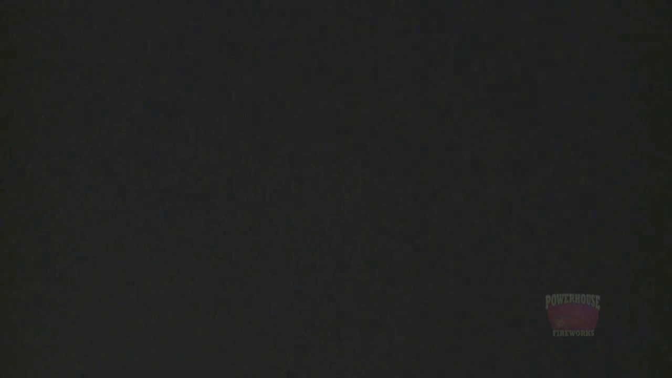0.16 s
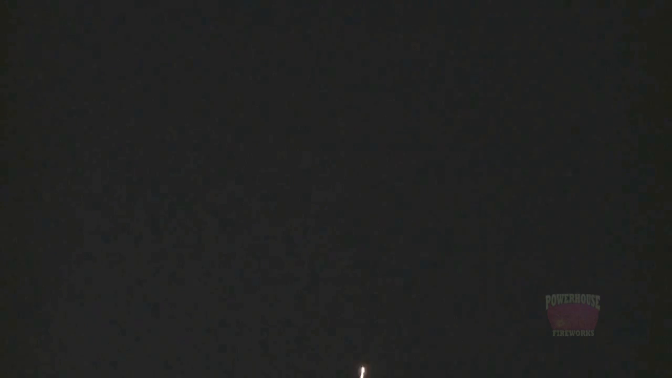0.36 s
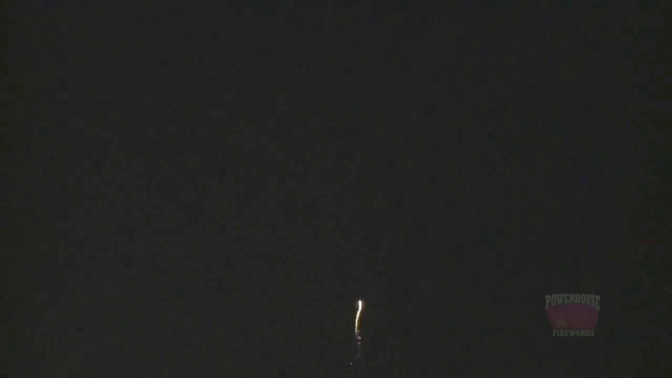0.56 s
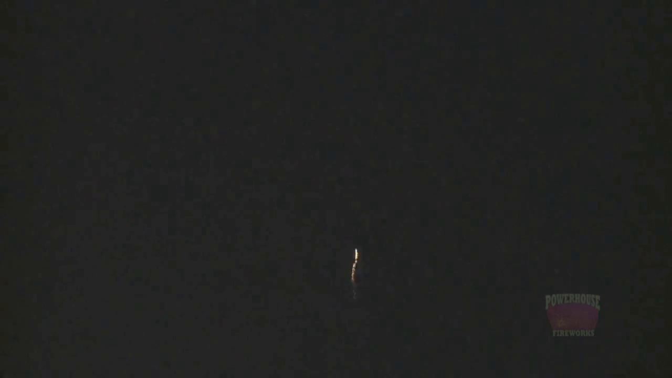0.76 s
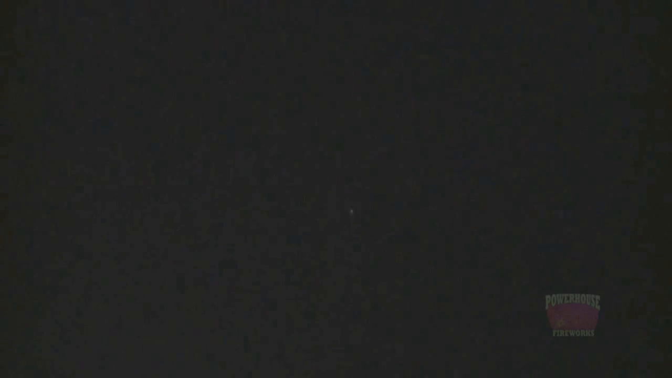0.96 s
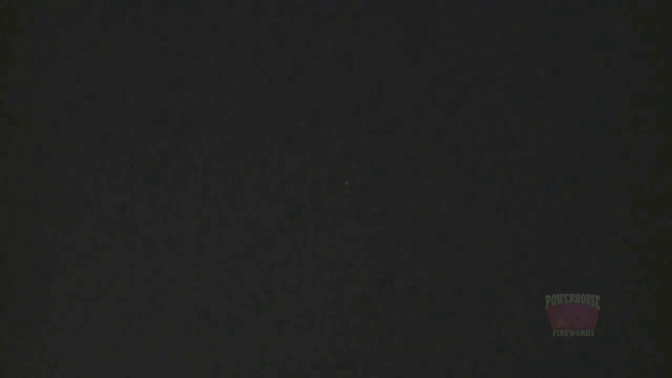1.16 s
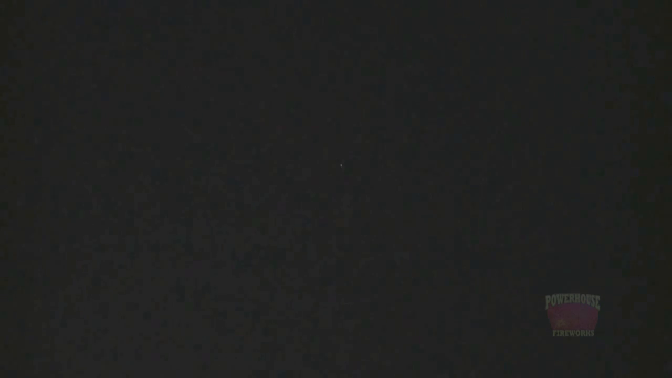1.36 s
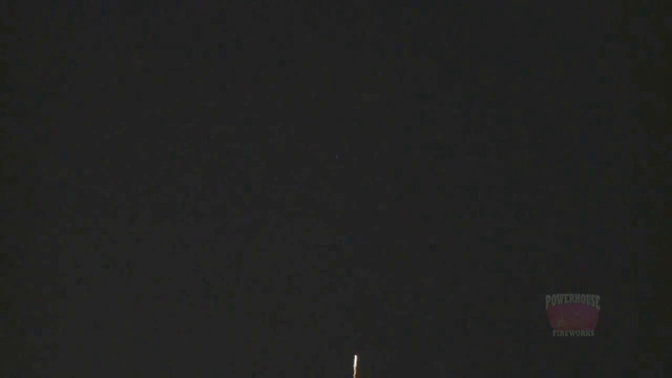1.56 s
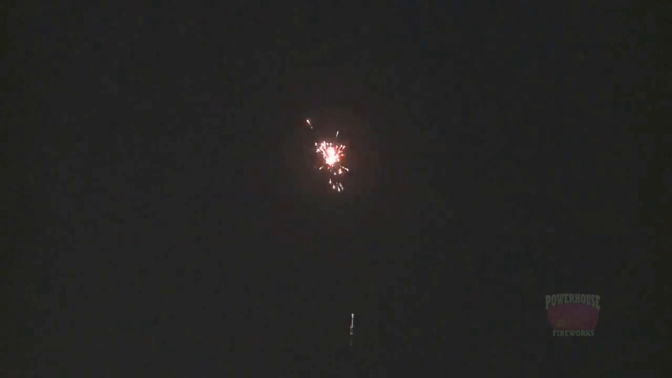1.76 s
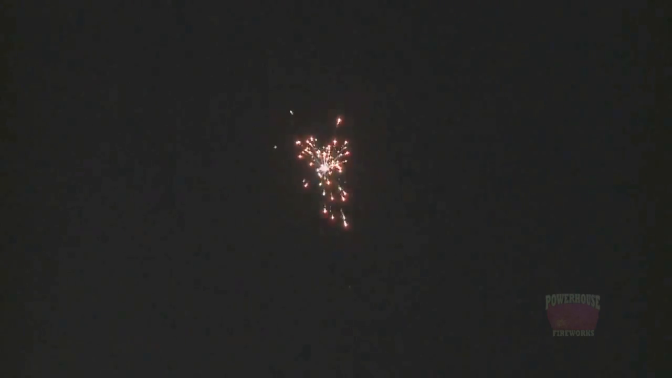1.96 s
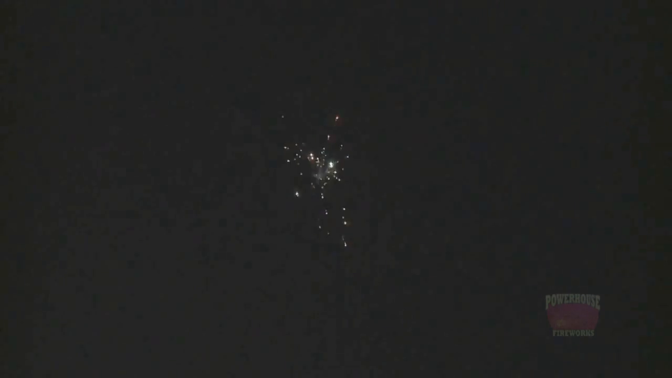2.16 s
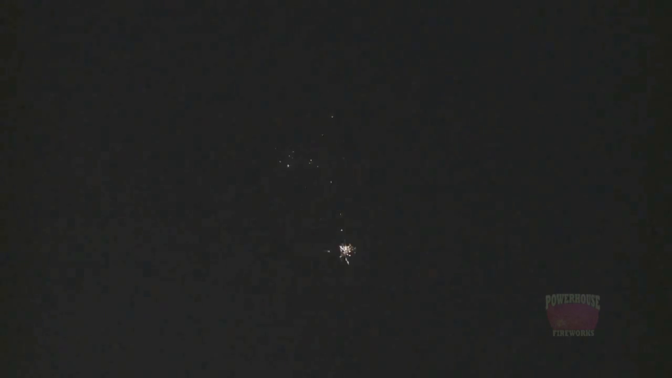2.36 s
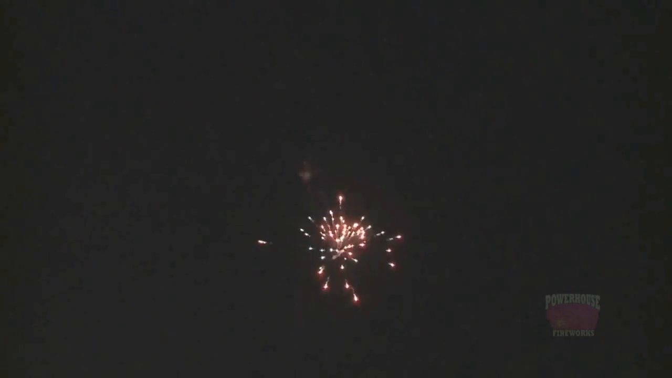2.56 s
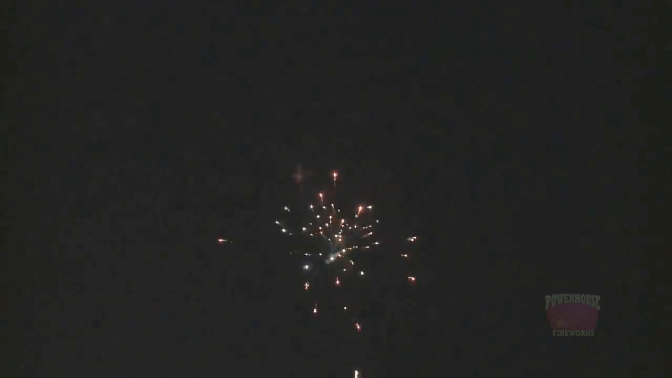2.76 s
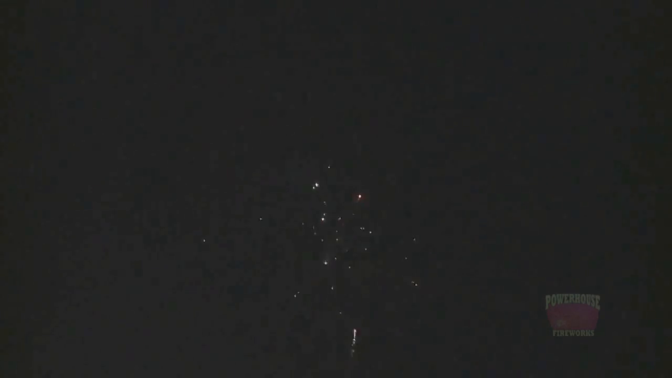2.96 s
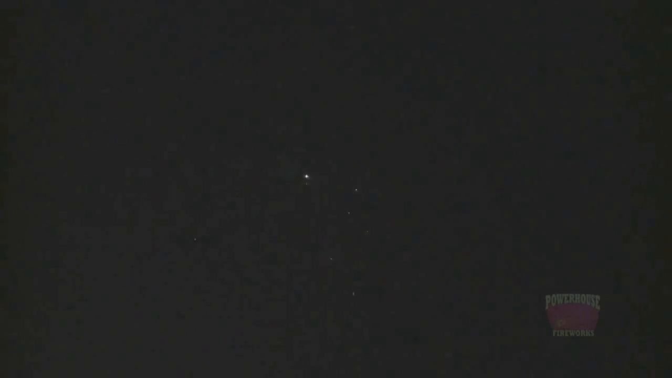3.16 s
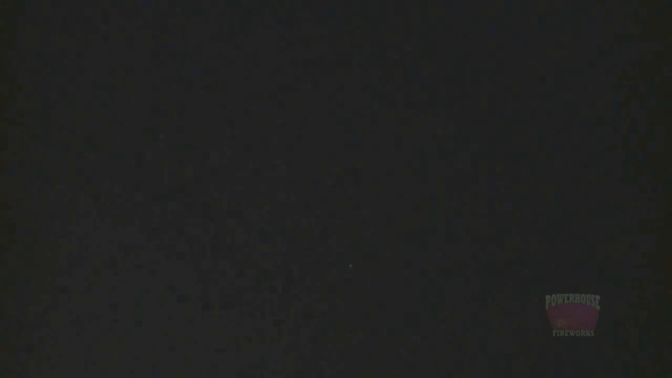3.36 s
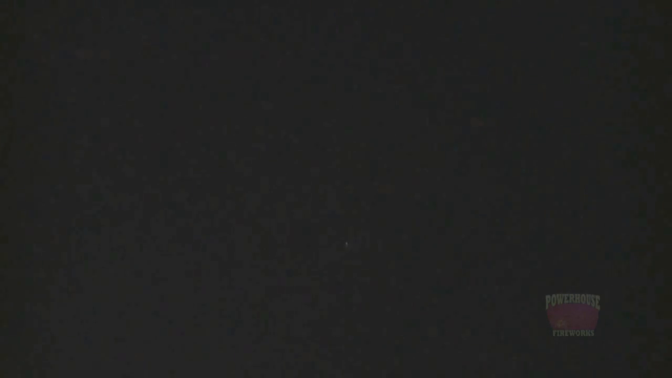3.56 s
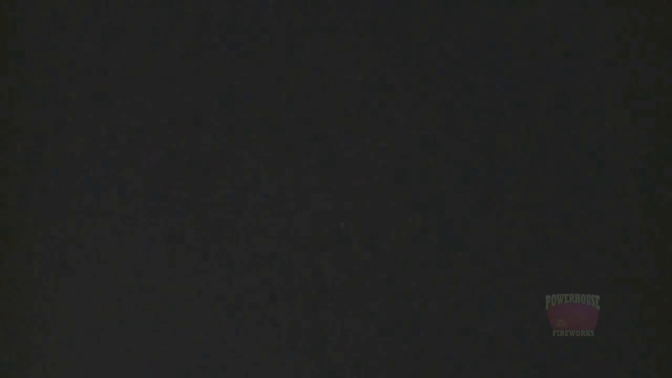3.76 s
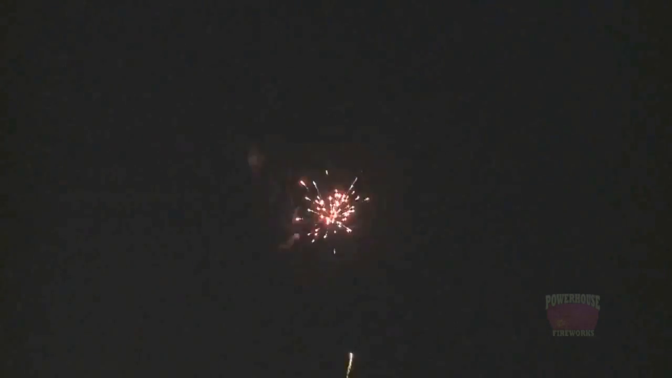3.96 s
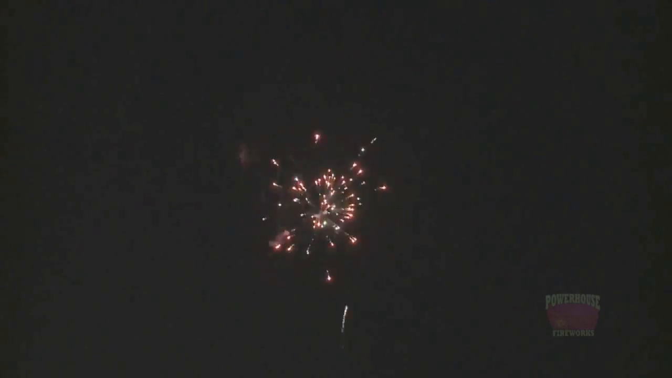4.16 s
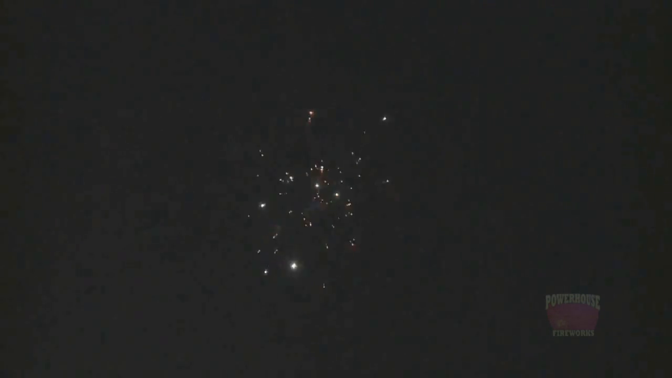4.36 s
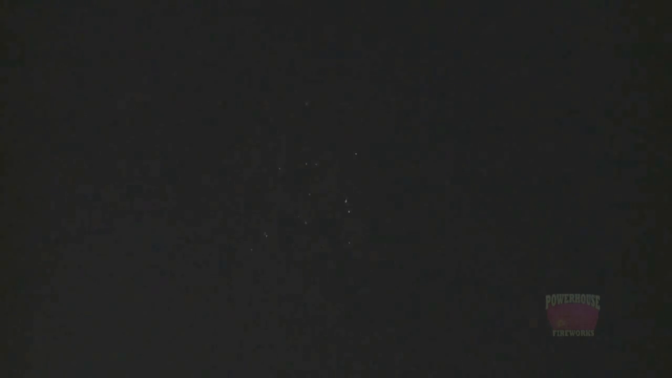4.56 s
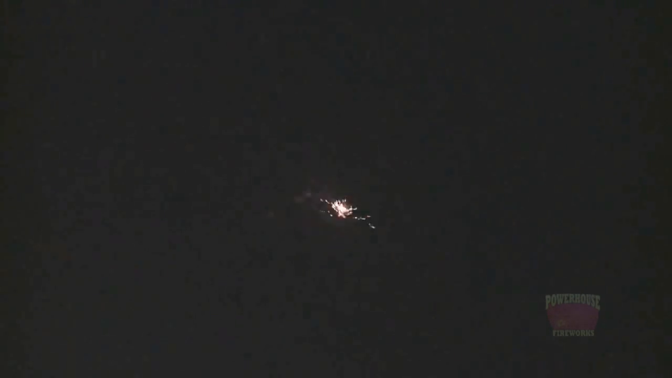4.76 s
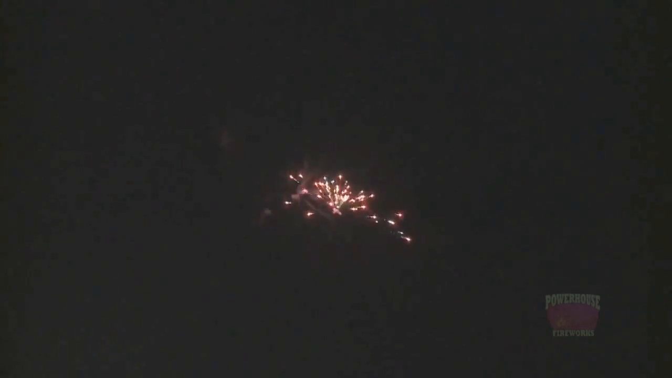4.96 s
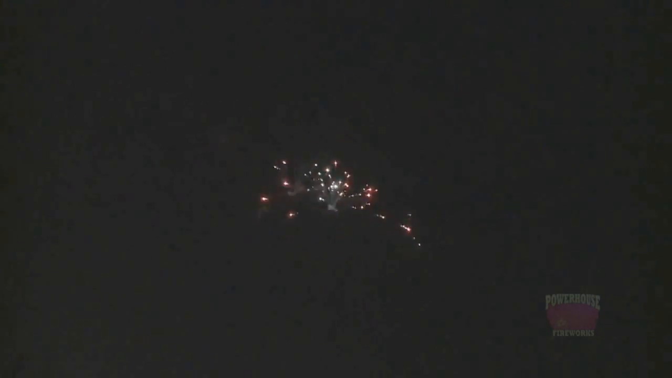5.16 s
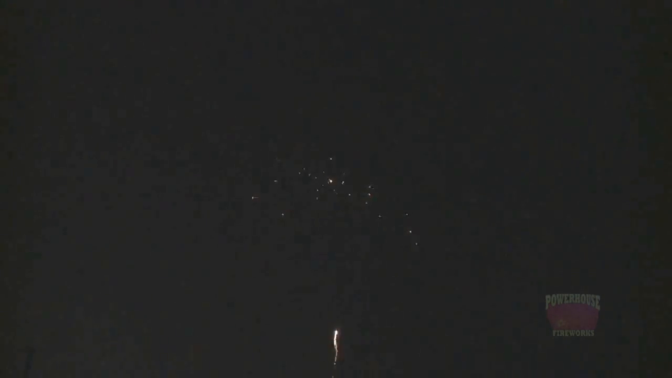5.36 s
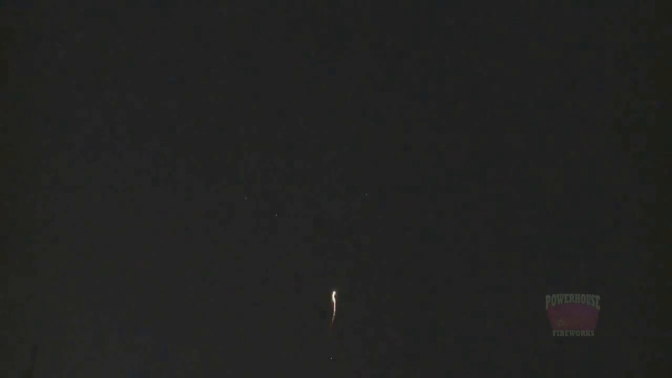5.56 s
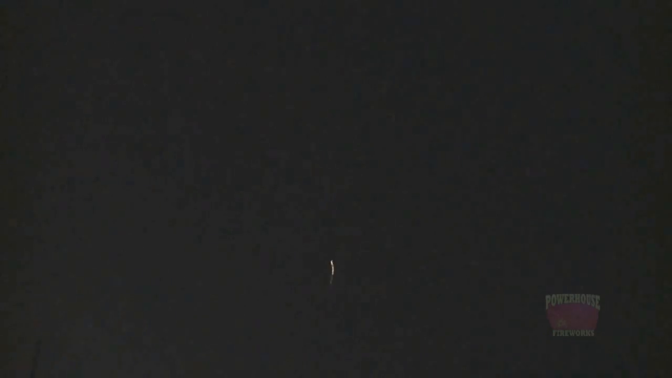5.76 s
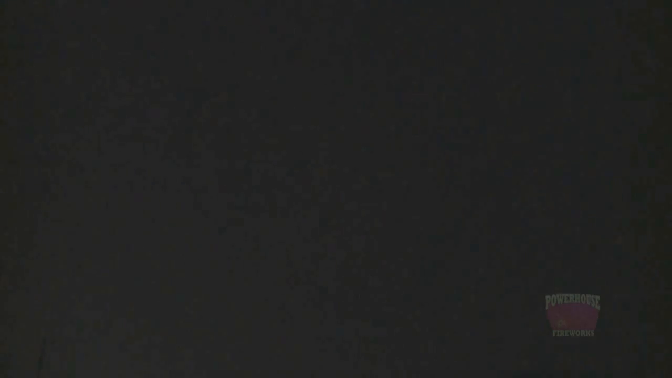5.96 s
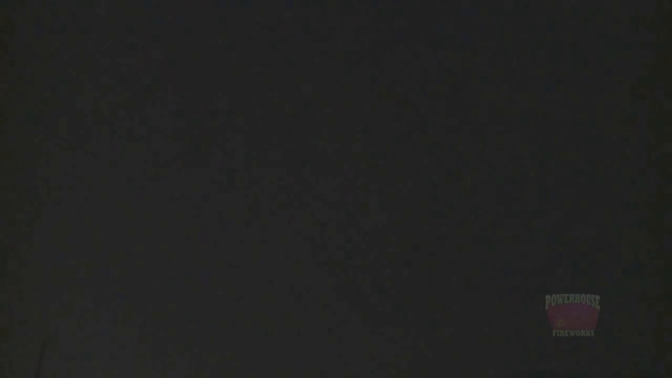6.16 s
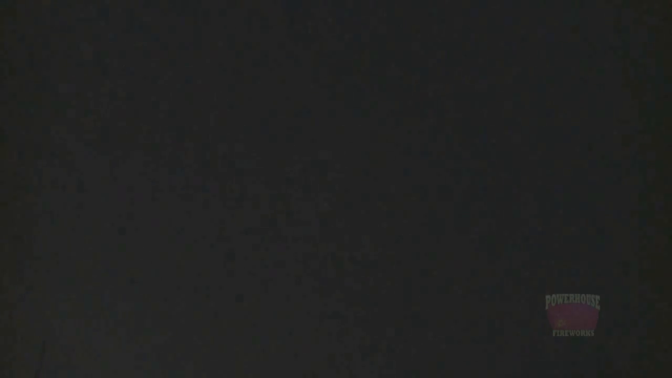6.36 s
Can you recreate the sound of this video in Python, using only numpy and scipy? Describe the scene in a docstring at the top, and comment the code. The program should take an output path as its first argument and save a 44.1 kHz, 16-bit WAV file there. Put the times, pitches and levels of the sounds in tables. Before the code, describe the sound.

The boom of a launch is already ringing at the start, then thumps and overhead cracks follow at uneven gaps. Walls and fences return quick slaps and brief rising tones; roofs patter back sharp echoes, and the neighbourhood rolls dully behind. Three small powder pops and a faint low engine hum hide in the night air. The close stereo microphone flattens the loudest blasts.

```python
"""A firework cake fires among houses at night: each lift charge thumps out of its cardboard tube, shells crack overhead.
Thumps are pulses with a ringing tube; cracks are brighter pulses. Walls, roofs, fences and trees answer both
with shaped noise, single echoes and short tones. Behind them lie three small pops, hissing night air and,
later on, the steady tone of a far engine. A small stereo microphone stands nearby and overloads on the peaks."""
import sys
import numpy as np
from scipy import signal
from scipy.fft import rfft, irfft
from scipy.io import wavfile

SR = 44100
rng = np.random.default_rng(int(sys.argv[2]) if len(sys.argv) > 2 else 0)


def int16_out(signal):
    """Quantize to a 16-bit WAV file."""
    q = np.round(np.clip(np.atleast_2d(signal).T, -1, 1) * 32767)
    wavfile.write(sys.argv[1], SR, q.astype(np.int16))


N = 286650  # samples in the scene
SIZE = 2 ** 17  # longest single sound, samples
T = np.arange(SIZE) / SR
HZ = np.maximum(np.fft.rfftfreq(SIZE, 1 / SR), 1)
# echo delays: a lift off the near wall and off the far house, a burst off the wall
WALL_S, HOUSE_S, OVERHEAD_ECHO_S = 0.0535, 0.4273, 0.066


def undb(db):
    """Decibels to gain."""
    return 10 ** (np.asarray(db) / 20)


def at(hz, points):
    """Read a table on a log-frequency axis."""
    table_hz, values = np.transpose(points)
    return np.interp(np.log(hz), np.log(np.maximum(table_hz, 1)), values)


def add(out, start_s, sound):
    """Mix a sound into out from start_s, cutting off whatever falls outside."""
    i = int(round(start_s * SR))
    first, last = max(i, 0), min(i + sound.shape[-1], out.shape[-1])
    if last > first:
        out[..., first:last] += sound[..., first - i:last - i]


def walk(rate_hz, size):
    """Random wander with a spread near 1: straight lines between rate_hz random points a second."""
    steps = np.arange(size) * rate_hz / SR
    return np.interp(steps, np.arange(SIZE // 32), rng.standard_normal(SIZE // 32))


def fade(t60, size=SIZE):
    """Exponential decay by 60 dB in t60 seconds."""
    return np.exp(-np.log(1000) * T[:size] / max(t60, 1e-3))


def strike(t60, rise_s, size):
    """Envelope that builds up and then dies away."""
    return fade(t60, size) * (1 - np.exp(-T[:size] / rise_s))


def pulse(points):
    """Causal (minimum-phase) pressure pulse with the given spectrum shape, peak 1."""
    cepstrum = irfft(np.log(undb(at(HZ, points))))
    # fold the second half onto the first, so that nothing sounds before the front
    cepstrum[1:SIZE // 2] *= 2
    cepstrum[SIZE // 2:] = 0
    x = irfft(np.exp(rfft(cepstrum)))[:SIZE // 8]
    return x / np.abs(x).max()


# width of diffuse sound at the two microphone ports: (frequency [Hz], side minus mid [dB])
PORT_WIDTH = [(60, -32), (150, -27.5), (360, -18), (870, -14.5), (1350, -8), (2100, -7.5), (3200, 3.5),
              (5000, 7), (8000, -29.5)]


def diffuse(points, size, tilt_db=0, grain_db=0, pivot_hz=600):
    """Dense arrivals from all sides, rms 1; grain_db spreads their sizes, and the ports agree in the bass."""
    hz = np.maximum(np.fft.rfftfreq(size, 1 / SR), 1)
    sizes = undb(grain_db * np.minimum(rng.standard_normal(size), np.pi))
    mid, side = rfft(sizes * rng.standard_normal((2, size)))
    width = undb(at(hz, PORT_WIDTH))
    tilt = tilt_db * np.log2(hz / pivot_hz)
    gain = undb(at(hz, points) + tilt) / np.hypot(1, width)
    x = irfft(gain * np.array([mid + width * side, mid - width * side]), size)
    return x / x.std()


# distant engine
ENGINE_START_S, ENGINE_SWELL_S, ENGINE_REV_S = 4.0, 0.095, 0.192  # start and two time constants
ENGINE_LOW_HZ, ENGINE_CRUISE_HZ = 87.8, 97.7  # firing rate at the start and once steady
ENGINE_DB, ENGINE_FADE_DB_PER_S = -38.5, 6


def engine(waver_db=1.5):
    """A far engine, one tone at its firing rate: it revs up, holds its speed and fades as it drives off."""
    t = np.maximum(np.arange(N) / SR - ENGINE_START_S, 0)
    hz = ENGINE_CRUISE_HZ + (ENGINE_LOW_HZ - ENGINE_CRUISE_HZ) * np.exp(-t / ENGINE_REV_S)
    level_db = ENGINE_DB - ENGINE_FADE_DB_PER_S * t + waver_db * walk(12, N)
    gain = (1 - np.exp(-t / ENGINE_SWELL_S)) * undb(level_db)
    return np.sqrt(2) * gain * np.sin(2 * np.pi * np.cumsum(hz) / SR)


# night air, spectrum shape: (frequency [Hz], relative level [dB])
NIGHT_AIR = [(25, -8), (60, -1.5), (150, 2), (500, 0), (1100, 7), (2600, -8.5), (4200, -24), (7000, -35.5),
             (10700, -30.5), (11400, -74)]


def background():
    """Night air as gently wavering noise with a faint hiss, and an engine droning far off."""
    air_gain = undb(-36 + 1.4 * walk(5.6, N))
    return engine() + air_gain * diffuse(NIGHT_AIR, N)


# dull sound of the far neighbourhood, spectrum shape: (frequency [Hz], relative level [dB])
FAR_ROLL = [(40, -44), (150, -10), (400, 3), (950, 4.5), (1400, 0), (2000, -11.5), (2700, -11),
            (4000, -27.5), (8000, -60)]


def roll(shots, level_db, t60, rise_s):
    """The far neighbourhood answers every shot with a long, dull, uneven roll; the powers add up."""
    power = np.zeros(N)
    for shot_s, _, tail_db, _ in shots:
        envelope = undb(level_db + tail_db) * strike(t60, rise_s, SIZE)
        add(power, shot_s, envelope ** 2)
    lumps = undb(1.8 * walk(25, N))
    return np.sqrt(power) * diffuse(FAR_ROLL, N, grain_db=5.5) * lumps


# snap of burning powder, spectrum shape: (frequency [Hz], relative level [dB])
POP_SNAP = [(300, -36), (1500, 5), (2500, 6), (4000, 0.5), (7000, -20), (10600, -12), (11500, -48)]
# small pops of burning powder: (time [s], snap level [dB], snap t60 [s], scattered sound level [dB])
POWDER_POPS = [(0.8673, -25, 0.042, -57), (5.341, -36, .06, -49), (5.606, -32, 0.17, -23.5)]


def pops():
    """Small noisy snaps of burning powder, each with a soft wash of echoes."""
    out, size = np.zeros((2, N)), SIZE // 4
    for pop_s, snap_db, t60, tail_db in POWDER_POPS:
        snap = diffuse(POP_SNAP, size) * strike(t60, 0.00044, size)
        add(out, pop_s, undb(snap_db) * snap)
        wash = diffuse(FAR_ROLL, size, tilt_db=2.5) * strike(0.7, 0.008, size)
        add(out, pop_s + 0.00201, undb(tail_db) * wash)
    return out


def scatter(points, t60s, tilt_db, grain_db, patchy_db, lumpy_db, rise_s):
    """Countless small echoes from nearby: they build up, come in clumps and die at a rate set by pitch."""
    size = SIZE // 2
    spectrum, hz = rfft(diffuse(points, size, tilt_db, grain_db)), HZ[::2]
    centres = [f for f, _ in t60s]
    out = 0
    # overlapping bands whose shares add up to one
    for share, (_, t60) in zip(np.eye(len(t60s)), t60s):
        band = irfft(spectrum * at(hz, np.c_[centres, share]))
        # each group of reflectors favours its own band
        out = out + band * strike(t60, rise_s, size) * undb(lumpy_db * walk(37.3, size))
    return out * undb(patchy_db * walk(159.1, size))


# crack of a shell, spectrum shape: (frequency [Hz], relative level [dB])
SHELL_CRACK = [(30, -27), (150, -7), (400, -0.5), (900, 8), (1500, 2.5), (2000, -3.5), (2600, -2.5),
               (3600, -4), (6000, -26.5), (10600, -34), (11600, -62)]


def slaps(table, tilt_db, patchy_db, air_db=6):
    """Crackly showers off rough reflectors; air dulls them by air_db per octave for each second of travel."""
    out, size = np.zeros((2, SIZE)), SIZE // 8
    for delay, db, t60 in table:
        shower = diffuse(SHELL_CRACK, size, tilt_db - air_db * delay) * undb(patchy_db * walk(348, size))
        add(out, delay, undb(db) * shower * strike(t60, 0.0013, size))
    return out


# boom of a lift in the gardens, spectrum shape: (frequency [Hz], relative level [dB])
GARDEN_BOOM = [(30, -28.5), (130, -15), (190, -9), (238, -2), (295, -4.5), (440, -0.5), (650, -2),
               (1000, -10), (1900, -19.5), (2500, -16.5), (3900, -31.5), (10400, -59.5), (11600, -69)]
# how fast that boom dies: (frequency [Hz], t60 [s])
GARDEN_T60 = [(60, 0.93), (250, 1.54), (500, 1.4), (1200, 0.82), (2500, 1.146), (5000, 0.75), (10000, 0.56)]


def lift_tail(tilt_db):
    """The boom of a lift scattered among the gardens at ground level."""
    return scatter(GARDEN_BOOM, GARDEN_T60, tilt_db, grain_db=4, patchy_db=1.9, lumpy_db=1.0, rise_s=0.016)


def knock(hz, width_s, front_db, lead_s):
    """A blast rounded by a long path: a cycle and a half centred on lead_s, with a trace of the sharp front."""
    t = T[:SIZE // 64] - lead_s
    body = -np.sin(2 * np.pi * hz * t) * np.exp(-(t / width_s) ** 2)
    front = diffuse(SHELL_CRACK, len(t)) * np.exp(-(2 * t / width_s) ** 2)
    return body + undb(front_db) * front


# far house: level of the first return [dB], loss on each further round trip [dB]
HOUSE_DB, HOUSE_LOSS_DB = 4, 18.5


def far_house(shot_s, count=2):
    """Dull knocks back from a far house, weaker on every round trip, each doubled by the near wall."""
    out, size = np.zeros((2, N)), SIZE // 8
    lead_s = 0.006
    for trip in range(count):
        db = HOUSE_DB - trip * HOUSE_LOSS_DB
        for wall_s in (0, WALL_S):
            arrival = shot_s + (trip + 1) * HOUSE_S + wall_s
            dull_knock = knock(hz=510, width_s=0.0012, front_db=-20, lead_s=lead_s)
            add(out, arrival - lead_s, undb(db) * dull_knock)
            wash = diffuse(GARDEN_BOOM, size) * strike(0.22, 0.0016, size)
            add(out, arrival, undb(db - 22.5) * wash)
    return out


# rising echoes of each lift, as from rows of fence boards:
# (delay [s], starting pitch [Hz], rise [Hz/s], fundamental [dB], octave [dB], t60 [s])
FENCE_ROWS = [(.05, 199.8, 1546, -17, 1.5, 0.18), (.205, 249.6, 660, -15.5, -21, 0.39)]


def fences(patchy_db=4.5):
    """Evenly spaced boards return a thump one after another, as a short rising tone."""
    out, size = np.zeros(SIZE // 4), SIZE // 16
    for delay, hz, rise, low_db, octave_db, t60 in FENCE_ROWS:
        phase = 2 * np.pi * np.cumsum(hz + rise * T[:size]) / SR
        tone = undb(low_db) * np.sin(phase) + undb(octave_db) * np.sin(2 * phase)
        patches = undb(patchy_db * walk(90, size))
        soft_end = np.minimum(np.linspace(10, 0, size), 1)
        add(out, delay, tone * strike(t60, 0.006, size) * patches * soft_end)
    return out


# separate roofs: time span [s], level [dB] before the fall with delay, fall [dB/s], spread either way [dB]
ROOF_SPAN_S, ROOF_DB, ROOF_FALL_DB_PER_S, ROOF_SPREAD_DB = 0.42, -1, 54, 2.5
# colour of one roof echo, spectrum shape: (frequency [Hz], relative level [dB])
ROOF_COLOUR = [(100, -37), (500, -7), (1100, 4), (2600, 3), (4200, -16), (6500, -26.5), (10500, -39),
               (11600, -64)]


def roofs(lag_s=0.00016, count=44):
    """Separate sharp echoes from all around: ever sparser and weaker, each reaching one port first."""
    out, crack = np.zeros((2, SIZE // 2)), pulse(ROOF_COLOUR)
    for place, side, roof_size in rng.uniform(-1, 1, (count, 3)):
        delay = OVERHEAD_ECHO_S + ROOF_SPAN_S * place ** 2
        echo_db = ROOF_DB - ROOF_FALL_DB_PER_S * delay + ROOF_SPREAD_DB * roof_size
        echo = undb(echo_db) * crack
        add(out[0], delay + lag_s * side, echo)
        add(out[1], delay - lag_s * side, echo)
    return out


# late ringing echo of a burst: centre of the first ring, half length of a ring, pitch, rise per repeat
RINGING_S, RINGING_WIDTH_S, RINGING_HZ, RINGING_STEP_HZ = 0.595, 0.023, 850, 8.4


def ringing(third_db=-1, count=3):
    """A late echo that rings roughly on one note and its third harmonic, and flutters off the near wall."""
    out, size = np.zeros((2, SIZE // 2)), SIZE // 2
    waver_hz, rough_db = 34, 4
    for k in range(count):
        swell = np.exp(-((T[:size] - RINGING_S - k * WALL_S) / RINGING_WIDTH_S) ** 2)
        for port in out:
            hz = RINGING_HZ + k * RINGING_STEP_HZ + waver_hz * walk(600, size)
            phase = 2 * np.pi * np.cumsum(hz) / SR
            tone = np.sin(phase) + undb(third_db) * np.sin(3 * phase)
            port += swell * undb(rough_db * walk(120, size)) * tone
    return out


# near scatter of a burst, spectrum shape: (frequency [Hz], relative level [dB])
OVERHEAD_SCATTER = [(30, -36), (130, -23), (230, -12.5), (440, -0.5), (1050, 2), (1550, -2), (2050, -7.5),
                    (2600, -2.5), (3900, -13), (6500, -24), (10400, -33.5), (11600, -53)]
# how fast that scatter dies: (frequency [Hz], t60 [s])
OVERHEAD_T60 = [(60, 0.88), (250, 1.19), (500, 0.88), (1200, 0.89), (2500, 0.78), (5000, 0.44),
                (10000, 0.38)]
# rough reflectors around a burst: (delay [s], relative level [dB], t60 [s])
OVERHEAD_SLAPS = [(0, 5.5, 0.24), (.066, -2.5, 0.21), (.255, -13, 0.08), (.382, -18, 0.097)]
# shell bursts: (time [s], relative blast [dB], relative scattered sound [dB], brightness [dB/octave])
SHELL_BURSTS = [(1.6643, 1, -2.5, 0), (2.3809, 1, 0.53, 0.03), (3.8530, 2, 0.6, 0.2),
                (4.7292, -1, -0.7, 0.45)]


def bursts(blast_peak_db=13, wall_db=-3, ringing_db=-33):
    """Each shell cracks high up, so roofs and trees throw it back; a wall repeats the scattered sound."""
    out, blast = np.zeros((2, N)), pulse(SHELL_CRACK)
    for burst_s, blast_db, tail_db, tilt_db in SHELL_BURSTS:
        add(out, burst_s, undb(blast_db + blast_peak_db) * blast)
        add(out, burst_s, undb(tail_db) * slaps(OVERHEAD_SLAPS, tilt_db, patchy_db=3.5))
        for delay, db in ((0, 0), (OVERHEAD_ECHO_S, wall_db)):
            tail = scatter(OVERHEAD_SCATTER, OVERHEAD_T60, tilt_db, grain_db=6.0, patchy_db=2.5,
                           lumpy_db=2.0, rise_s=0.0016)
            add(out, burst_s + delay, undb(tail_db + db - 3.5) * tail)
        late_echoes = roofs() + undb(ringing_db) * ringing()
        add(out, burst_s, undb(tail_db) * late_echoes)
    return out + roll(SHELL_BURSTS, level_db=-14.5, t60=3.02, rise_s=0.23)


# thump of a lift charge, spectrum shape: (frequency [Hz], relative level [dB])
LIFT_THUMP = [(30, -58), (100, -6.5), (250, -1.5), (480, 10), (700, 5), (1100, -6.5), (2400, -7),
              (4000, -37.5), (10500, -37), (12000, -99.5)]
# ring of the cardboard tube: (frequency [Hz], level relative to the blast [dB], t60 [s])
TUBE_RING = [(60.6, -37, 0.12), (235, -13.5, 0.12), (358.4, -16.5, 0.15), (429, -11.5, 0.11),
             (537, -19.5, 0.054)]
# rough reflectors, hedges and fences around a lift: (delay [s], relative level [dB], t60 [s])
GROUND_SLAPS = [(.017, -3.5, 0.12), (.053, -8, .09), (.093, -8, 0.069)]
# lift charges, the first just before the start:
# (time [s], relative blast [dB], relative scattered sound [dB], brightness [dB/octave])
LIFT_CHARGES = [(-.0928, 5, 1.5, 2), (0.9961, 0, -0.5, 2), (2.1264, -2, -3.5, 1), (3.3818, 0, -1, 1.4),
                (4.8149, 0, -2, 2), (6.107, -3.5, -6.5, 0)]


def lifts(blast_db=14.0, gas_db=-14, wall_db=-2, alike=0.5):
    """Each charge thumps, puffs gas and rings its tube; a near wall doubles the thump."""
    out, blast = np.zeros((2, N)), pulse(LIFT_THUMP)
    size = len(blast)
    ring = np.zeros(size)
    for hz, db, t60 in TUBE_RING:
        ring += undb(db) * strike(t60, 0.00033, size) * np.sin(2 * np.pi * hz * T[:size])
    # all tubes stand on one spot, so part of the echo pattern is the same for every shot
    common = lift_tail(0)
    for lift_s, charge_db, tail_db, tilt_db in LIFT_CHARGES:
        gas = undb(gas_db) * diffuse(LIFT_THUMP, size, tilt_db) * strike(0.13, 0.00045, size)
        thump = undb(blast_db + charge_db) * (blast + ring + gas)
        add(out, lift_s, thump)
        add(out, lift_s + WALL_S, undb(wall_db) * thump)
        add(out, lift_s, undb(tail_db) * slaps(GROUND_SLAPS, tilt_db, patchy_db=-1.0))
        tail = np.sqrt(alike) * common + np.sqrt(1 - alike) * lift_tail(tilt_db)
        add(out, lift_s + 0.03, undb(tail_db - 6.0) * tail)
        add(out, lift_s, undb(tail_db) * fences())
        out += far_house(lift_s)
    return out + roll(LIFT_CHARGES, level_db=-27.5, t60=8.2, rise_s=0.025)


def scene():
    """Lifts, bursts and pops over the night background."""
    return lifts() + bursts() + pops() + background()


def record(dry, knee=5.7):
    """The small microphone flattens the loud peaks (a higher knee bends later); the top is cut."""
    top_hz = 15800
    clipped = dry / (1 + np.abs(dry) ** knee) ** (1 / knee)
    lowpass = signal.ellip(8, 0.01, 60, top_hz, fs=SR, output="sos")
    return np.clip(signal.sosfiltfilt(lowpass, clipped), -1, 1)


dry = scene()
out = record(dry)
int16_out(out)
```